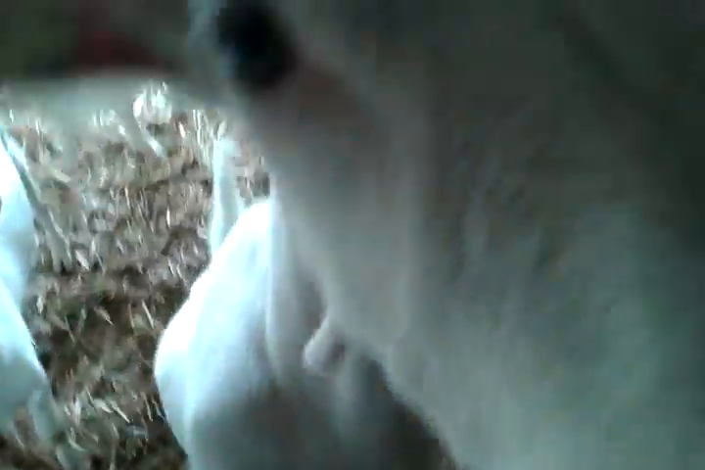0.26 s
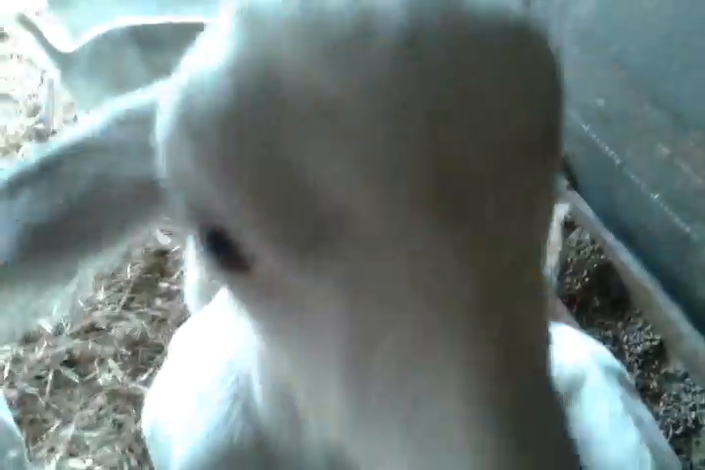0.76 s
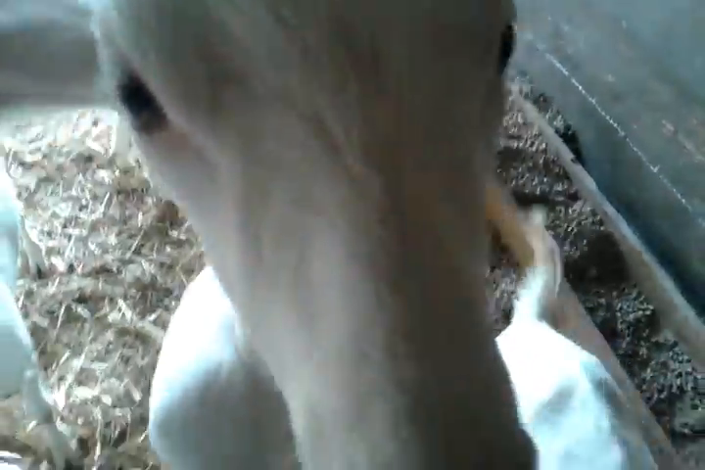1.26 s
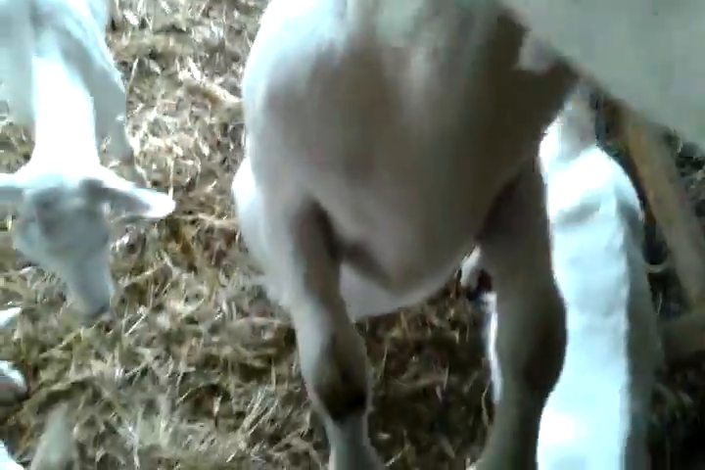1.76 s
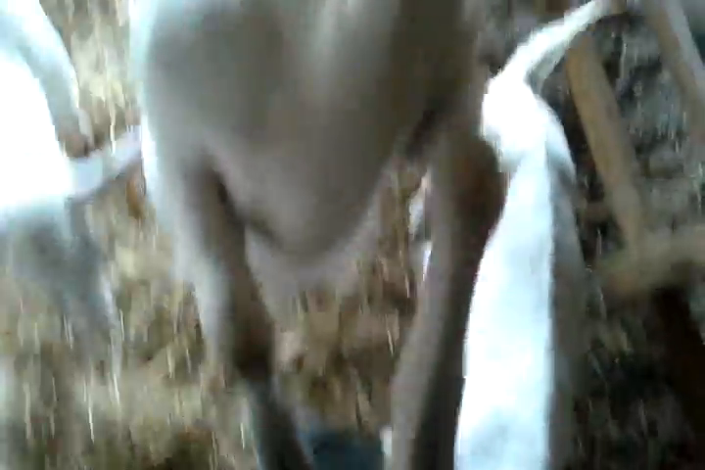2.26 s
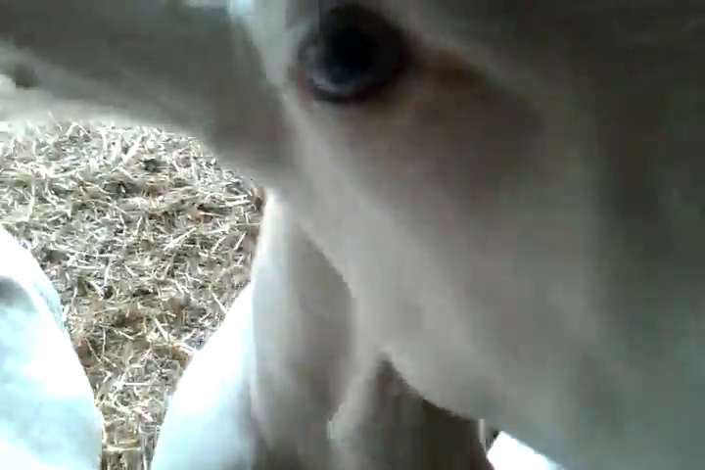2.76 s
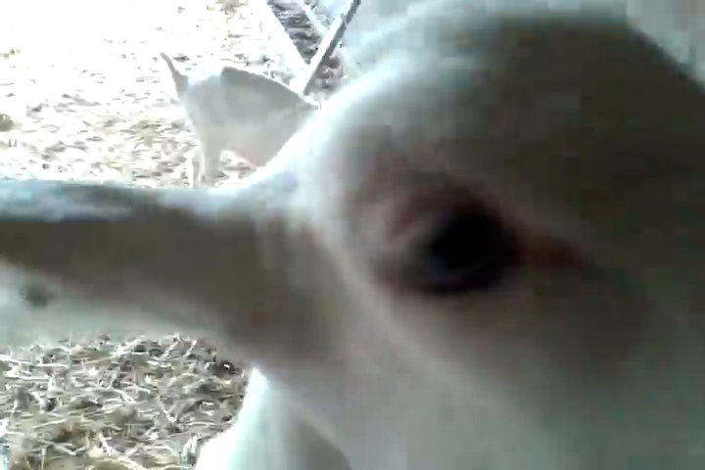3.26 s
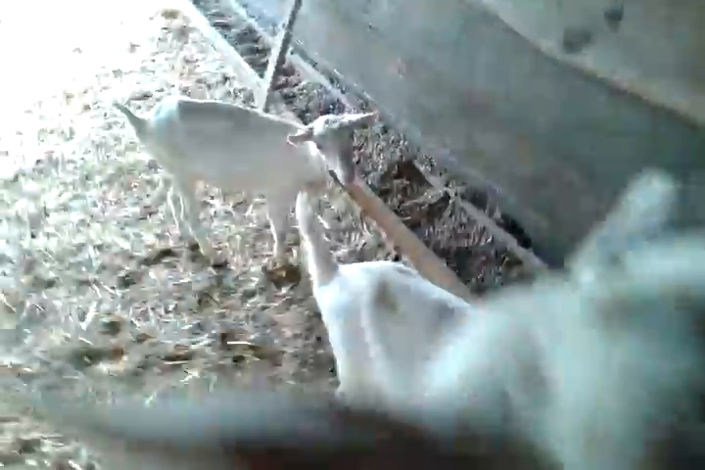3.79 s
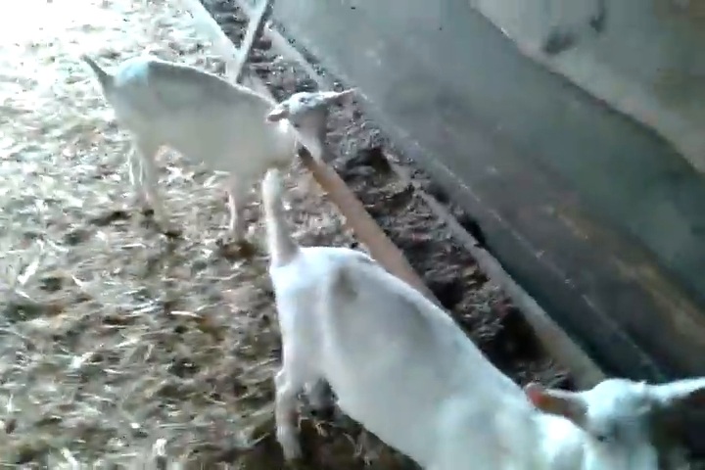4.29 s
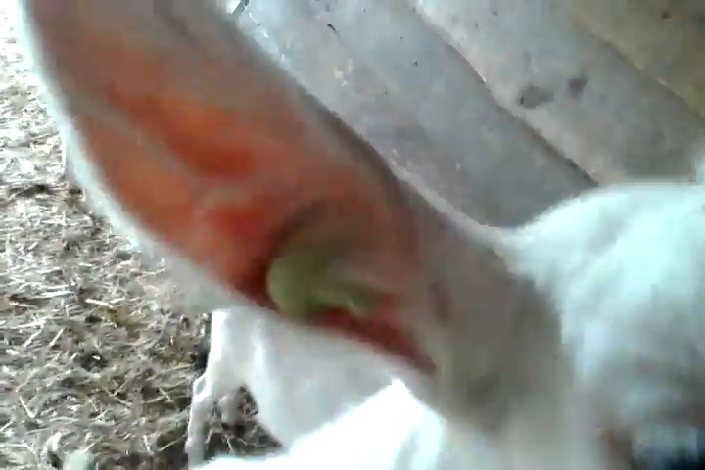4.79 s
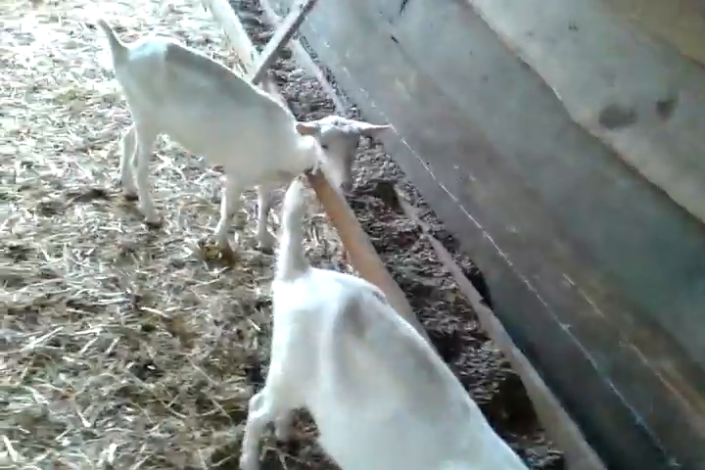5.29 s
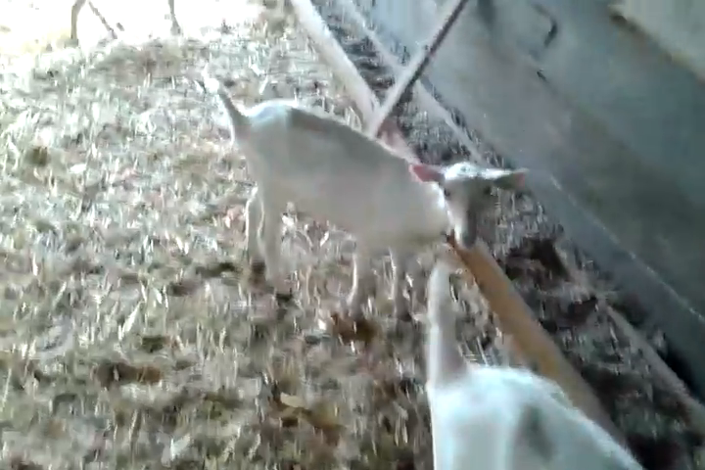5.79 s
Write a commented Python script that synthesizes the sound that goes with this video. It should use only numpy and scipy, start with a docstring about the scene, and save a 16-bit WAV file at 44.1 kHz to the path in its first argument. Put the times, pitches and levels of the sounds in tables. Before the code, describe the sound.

One loud quavering kid-goat bleat up close, then rustling straw, a whistly sniff, soft microphone bumps and late hard knocks on loose wood.

```python
"""A young goat bleats close to the microphone in a straw-bedded pen; another answers faintly from afar. Hooves
shuffle in the straw, a muzzle sniffs at the microphone, bodies bump it and hooves knock a wooden trough. Voices
are harmonics and breath through gliding formants; straw is grainy noise, and the rustle sounds strongest near
1.7 and 8 kHz. Snaps and bumps are noise puffs through a resonance; the trough is a set of dying modes."""
import sys
import numpy as np
from scipy import signal
from scipy.fft import rfft, irfft, next_fast_len
from scipy.io import wavfile
from scipy.ndimage import uniform_filter1d, map_coordinates

SR = 44100
rng = np.random.default_rng(int(sys.argv[2]) if len(sys.argv) > 2 else 0)


def digitize_waveform(pressure):
    """Quantize a signal to 16-bit integers and store it at the path in sys.argv[1].

    Rows of a 2-D input are taken as channels; values are limited to [-1, 1].
    """
    field = np.atleast_2d(pressure).T
    bounded = np.clip(field, -1, 1)
    quanta = np.round(bounded * 32767).astype(np.int16)
    wavfile.write(sys.argv[1], SR, quanta)


N = 266362  # samples


def amp(db):
    """Decibels to amplitude factor."""
    return 10 ** (np.asarray(db) / 20)


def unit(x):
    """x scaled to an rms of 1."""
    return x / np.sqrt(np.mean(x ** 2) + 1e-20)


def along(points, hz):
    """(Hz, value) points read at hz on a log frequency axis."""
    f, v = np.transpose(points)
    return np.interp(np.log(hz + 1), np.log(f + 1), v)


def curves(rows, t):
    """Each column after the time, read at times t."""
    s, *cols = np.transpose(rows)
    return [np.interp(t, s, c) for c in cols]


def wobble(rate, size=N):
    """A smooth random curve, rate knots a second."""
    knots = rng.standard_normal(int(size * rate / SR) + 4)
    return map_coordinates(knots, [np.arange(size) * rate / SR])


def filtered(x, response):
    """x times a complex response of frequency."""
    m = next_fast_len(len(x) + 8192)
    spectrum = rfft(x, m) * response(np.fft.rfftfreq(m, 1 / SR))
    return irfft(spectrum, m)[:len(x)]


def peak(hz, centre_hz, width_hz):
    """Response of one causal resonance."""
    return 1j * hz * width_hz / (centre_hz ** 2 - hz ** 2 + 1j * hz * width_hz)


def add(track, s, sound):
    """Mix a sound in at s seconds."""
    spot = track[round(s * SR):][:len(sound)]
    spot += sound[:len(spot)]


def steady(x):
    """x with its slow level divided out."""
    return x / np.sqrt(np.abs(uniform_filter1d(x ** 2, SR // 40)) + 1e-12)


def tract(hz, shape):
    """Gain of mouth, throat and body at hz, for the formant frequencies and strengths in shape."""
    # widths of the four mouth formants [Hz]
    formant_widths_hz = [150, 190, 158, 325]
    # the throat's fixed ring: f/Hz, width/Hz, level/dB
    throat_ring = [(5400, 1500, -6), (6900, 600, 0), (7550, 400, -1)]
    # unmoving resonances of chest and nose: f/Hz, width/Hz, level/dB
    chest_and_nose = [(305, 120, -14.5), (655, 92, -12)]
    throat_top_hz = 7830
    formants_hz, second_db, third_db, fourth_db, ring_db = shape[:4], *shape[4:]
    strengths = amp([0 * ring_db, second_db, third_db, fourth_db])
    formants = zip(formants_hz, formant_widths_hz, strengths)
    mouth = sum(np.abs(g * peak(hz, c, w)) ** 2 for c, w, g in formants)
    ring = sum(amp(db) * np.abs(peak(hz, c, w)) ** 2 for c, w, db in throat_ring)
    body = sum(np.abs(amp(db) * peak(hz, c, w)) ** 2 for c, w, db in chest_and_nose)
    pocket = amp(-5 * np.exp(-((hz - 4600) / 200) ** 2))  # a side pocket of the throat traps this band
    gain = np.sqrt(body + mouth + (amp(ring_db) * ring) ** 2)
    return gain * pocket / np.sqrt(1 + (hz / throat_top_hz) ** 24)


def voice(folds, level_rows, mouth, quavers, jitter, shimmer_db, count):
    """Harmonics of the vocal folds and air noise, through a mouth whose formants may glide."""
    t = np.arange(level_rows[0][0] * SR, level_rows[-1][0] * SR) / SR
    (hz, hoarse), (db,) = curves(folds, t), curves(level_rows, t)
    slack_hz = sum(depth_hz * np.exp(-((t - s) / width) ** 2) for s, depth_hz, width in quavers)
    hz = hz - slack_hz
    hz = hz * (1 + jitter * np.sqrt(hoarse) * wobble(150, size=len(t)))  # hoarse cycles are uneven
    phase = 2 * np.pi * np.cumsum(hz) / SR

    slow = slice(None, None, 32)  # the mouth moves slowly
    shape = curves(mouth, t[slow])
    tone = np.zeros(len(t))
    for k in range(1, count + 1):
        level_db = -0.022 * k * slack_hz  # slack folds close softly and dull the upper harmonics
        level_db += shimmer_db * (1 + k / 16) * wobble(45.06, size=len(t))
        gain = np.interp(t, t[slow], tract(k * hz[slow], shape))
        # phases spread within each cycle and the overtones drift
        lag = .04 * k * wobble(55, size=len(t)) - .13 * k * k
        tone += amp(level_db) * gain * np.cos(k * phase + lag)

    f, frames, z = signal.stft(rng.standard_normal(len(t)), SR, nperseg=1024)
    f = f[:, None]
    z = z * tract(f, curves(mouth, t[0] + frames))
    z = z * (f / (f + 1500)) ** 2  # air noise is weak in the bass
    air = signal.istft(z, SR, nperseg=1024)[1][:len(t)]
    breath = steady(air) * (.9 + .6 * np.cos(phase))  # puffed once a cycle

    out = np.zeros(N)
    add(out, t[0], amp(db) * (np.sqrt(1 - hoarse) * steady(tone) + np.sqrt(hoarse) * breath))
    return out


def near_goat():
    """The close bleat: the folds quaver in pitch while the mouth opens and shuts."""
    # loudness of the bleat: t/s, level/dB
    bleat = [(0, -34), (.06, -43.5), (.23, -36.5), (.27, -33.5), (.32, -29), (.5, -27.5), (.56, -30),
             (.63, -28), (0.846, -28), (.865, -34.5), (.885, -41.5), (.94, -52.5), (.97, -78)]
    # vocal folds: t/s, f/Hz of the pitch, hoarseness [0-1]
    folds = [(0, 287, .2), (.04, 288, .15), (.062, 325, .04), (.15, 325, .015), (.232, 335, .02),
             (.26, 328, .05), (.43, 328.5, .06), (.47, 329, .02), (.515, 331.5, .02), (.57, 329, .025),
             (.6, 322, .03), (.655, 323, .03), (.682, 332.5, .03), (.72, 323.5, .025), (.748, 323, .03),
             (.775, 314, .02), (.835, 314, .02), (.89, 276, .12), (.97, 268, .08)]
    # opening mouth: t/s, four formants f/Hz, then level/dB of second, third, fourth and of the throat's ring
    mouth = [(.03, 290, 1830, 2040, 3780, 0, -28, -2, -31), (.17, 314, 1340, 1960, 3180, -8, -5, -15, -19),
             (.25, 425, 1200, 1990, 3460, -4.5, -11, -19, -16),
             (.33, 660, 1500, 2000, 3800, -49, -13.5, -7.5, -11.5),
             (.42, 780, 1400, 2020, 3800, -23, -4.5, -8.5, -9),
             (.5, 890, 1360, 1970, 3930, -24, 2, 0.5, -9), (.56, 830, 1550, 2290, 3630, -2.5, -7, -12, -8),
             (.63, 870, 1530, 2200, 3180, 0, -4, -6.5, -4.5),
             (.69, 750, 1430, 2310, 3970, -1, -1.5, 4.5, -3.5),
             (.74, 725, 1610, 2240, 3180, 5.5, 3, 0.5, -3),
             (.82, 605, 1580, 2200, 3320, -0.5, -5.5, -11.5, -8.5),
             (.88, 605, 1420, 2050, 3320, -0.5, -16, -9, -15),
             (.93, 278, 1360, 2020, 3420, -22, -30, -30, -35)]
    # pitch dips: t/s, depth/Hz, half width/s
    quavers = [(.304, 13, .014), (.368, 12, .015), (.414, 11, .012), (.548, 3, .01), (.638, 5, .011)]
    return voice(folds, bleat, mouth, quavers, jitter=.012, shimmer_db=1.8, count=30)


def shuffle():
    """Straw hisses, hooves scuff and bodies rumble as the herd moves; a dragged hoof swells briefly."""
    # the herd's steady stirring: t/s, straw hiss level/dB, body rumble level/dB
    stirring = [(0, -45.5, -59), (.5, -40.5, -56), (.95, -46, -55), (1.2, -39, -53.5), (1.28, -43, -70),
                (1.7, -43.5, -52), (2.06, -43.5, -52), (2.11, -47, -63), (2.3, -48.5, -70),
                (2.5, -43.5, -58), (2.72, -50, -62), (2.95, -42, -64), (3.3, -42.5, -55),
                (3.41, -51, -65.5), (3.78, -49.5, -68.5), (4.2, -44.5, -65), (4.36, -53.5, -67.5),
                (4.65, -54.5, -70), (4.75, -43.5, -72), (5.12, -43.5, -68), (5.2, -40.5, -56),
                (5.65, -46, -43), (5.85, -46, -69), (6.04, -46, -67)]
    # hooves dragged through straw: t/s, length/s, then level/dB of hiss, scuff and rumble
    scrapes = [(0, 0.13, -60, -41.5, -49.5), (0.152, .28, -47.5, -46.5, -81), (0.376, 0.13, -57, -60, -48),
               (0.678, 0.034, -60, -60, -48), (0.712, 0.11, -49, -62, -38.5),
               (1.582, 0.12, -65, -58.5, -58), (1.762, 0.031, -78, -49, -52.5),
               (1.826, .06, -74, -50, -49.5), (1.875, 0.14, -48, -51, -80), (2.122, 0.15, -45.5, -64, -89),
               (2.3, 0.092, -50, -66, -61), (2.364, 0.13, -49.5, -70, -67), (2.663, 0.049, -59, -60, -54),
               (2.766, 0.13, -58, -58.5, -87), (2.885, 0.12, -59, -52, -45), (3.015, 0.14, -55, -52.5, -62),
               (3.161, .13, -55, -50.5, -53), (3.426, .04, -51, -80, -78), (3.452, 0.16, -54.5, -61, -87),
               (3.622, 0.16, -51.5, -64.5, -62), (3.782, 0.13, -48.5, -51.5, -58.5),
               (4.01, 0.18, -55, -68, -78), (4.393, 0.036, -51, -60, -76), (4.494, 0.12, -54, -67, -78),
               (4.799, 0.058, -48, -57, -62), (4.934, 0.041, -53, -50, -55.5),
               (5.183, 0.049, -44, -45.5, -48), (5.325, .048, -74, -61, -60), (5.41, 0.017, -59, -37, -70),
               (5.54, 0.044, -59, -52, -42), (5.63, .019, -57, -39.5, -58), (5.636, 0.065, -54, -36, -53),
               (5.703, 0.12, -48, -48, -51), (5.813, 0.078, -49, -72, -82), (5.898, 0.057, -50, -63, -66),
               (5.997, 0.041, -62, -48, -80)]
    # spectra of the three layers: f/Hz, level/dB per Hz
    straw_spectrum = [(1470, -28), (2500, -19), (5390, -14), (7220, -0.5), (7980, 2), (9600, -13),
                      (15100, -24.5), (15700, -33)]
    scuff_spectrum = [(400, -15.5), (700, -15), (1300, -8.5), (1620, 1.5), (1900, 2), (2500, -9),
                      (3600, -9.5), (4800, -15.5), (5900, -25), (7000, -14), (9000, -120)]
    rumble_spectrum = [(18, -40), (30, 4), (70, -0.5), (156, -6.5), (276, -0.5), (500, -2.5), (700, -6),
                       (1000, -10.5), (1400, -6), (2200, -55)]
    hiss, rumble = amp(curves(stirring, np.arange(N) / SR))
    scuff = amp(-11) * hiss  # the steady scuff lies 11 dB below the straw hiss
    for s, length, *levels_db in scrapes:
        swell = np.sqrt(np.hanning(round(length * SR)))
        for layer, db in zip((hiss, scuff, rumble), levels_db):
            add(layer, s, amp(db) * swell)
    hiss = hiss * rustle(straw_spectrum, grain_db=1.0, flicker_db=0.77)
    scuff = scuff * rustle(scuff_spectrum, grain_db=0.5, flicker_db=1.5)
    return hiss + scuff + rumble * rustle(rumble_spectrum, grain_db=1.5, flicker_db=3)


def rustle(spectrum, grain_db, flicker_db):
    """Noise of unsteady level, shaped to a spectrum, of rms 1."""
    level_db = grain_db * wobble(700) + flicker_db * wobble(45)
    grains = amp(level_db) * rng.standard_normal(N)
    return unit(filtered(grains, lambda hz: amp(along(spectrum, hz))))


def straw_snaps():
    """Stalks snap in mid band and thin ones tick high up, each a short broad pop."""
    # straw snaps: t/s, peak level/dB, centre f/Hz, puff t60/s, width [share of centre]
    snaps = [(.049, -24.5, 1580, 0.02, 1.2), (.4475, -17, 1820, 0.018, 0.5),
             (.734, -20.5, 1360, 0.017, 0.7), (1.436, -35, 900, 0.025, 2.3),
             (2.323, -39, 1197, 0.0081, 1.5), (2.3735, -30, 1150, 0.0073, 1.1),
             (2.5545, -26.5, 1840, 0.0024, 0.33), (2.684, -34.5, 900, 0.004, 1.4),
             (3.088, -33, 1100, .006, 1.4), (4.393, -42.5, 800, .0035, 3.3),
             (4.565, -38, 1500, 0.0097, 2.9), (4.828, -27.5, 1920, 0.026, 0.3), (4.95, -34, 1835, .008, 1),
             (5.1945, -23, 1660, 0.019, 1.5), (5.4055, -24, 1800, 0.033, 1.1),
             (5.6345, -26.5, 2230, 0.024, 0.29), (5.6615, -26, 4570, .0049, .41),
             (5.931, -31, 1010, 0.0065, 1.5)]
    # thin stalks ticking: t/s, peak level/dB
    thin_stalks = [(.1915, -26), (.4225, -32), (2.344, -37), (2.9737, -40), (3.3454, -34), (4.155, -30),
                   (4.4484, -29), (4.706, -41), (5.1977, -36), (5.408, -38)]
    tick_hz, tick_t60_s, tick_width = 9800, 0.0039, 1.1
    ticks = [(s, db, tick_hz, tick_t60_s, tick_width) for s, db in thin_stalks]
    return pops(snaps + ticks, puff=0.25)


def bumps():
    """Bodies nudge the microphone: soft low pops with little noise in them."""
    # bumps: t/s, peak level/dB, centre f/Hz
    nudges = [(.742, -32, 504), (1.449, -44.5, 150), (1.619, -44, 88.5), (1.796, -34.5, 276),
              (2.382, -46, 130), (2.686, -39, 165), (2.914, -36.5, 200), (3.091, -38, 233),
              (3.19, -44, 79.5), (3.29, -45, 80), (3.441, -43.5, 103), (3.633, -46.5, 105),
              (3.664, -50, 90), (3.88, -41.5, 120), (4.394, -41.5, 208), (5.161, -40.5, 127)]
    t60_s, width = 0.057, 1.13  # of the noise puff; share of centre
    return pops([(s, db, hz, t60_s, width) for s, db, hz in nudges], puff=0.023)


def pops(rows, puff):
    """One push and a dying puff of noise through a broad resonance."""
    out, t = np.zeros(N), np.arange(SR // 6) / SR
    for s, db, hz, t60, spread in rows:
        push = puff * amp(-60 * t / t60) * rng.standard_normal(len(t))
        push[0] += 1
        pop = filtered(push, lambda f: peak(f, hz, spread * hz) ** 2)
        add(out, s, amp(db) * pop / np.abs(pop).max())
    return out


def sniff():
    """Air whistles through the nostrils in fluttering puffs."""
    # one table a sniff: t/s, level/dB
    sniffs = [
        [(0.95, -45.5), (1.07, -27), (1.092, -32), (1.118, -29), (1.182, -27.5), (1.25, -50), (1.28, -57)],
        [(4.68, -56), (4.716, -46), (4.788, -47), (4.816, -32.5), (4.842, -53), (4.862, -41), (4.9, -58)],
    ]
    # nostril resonances: f/Hz, width/Hz, level/dB
    nostrils = [(6220, 880, -4.5), (7630, 360, 13), (8200, 390, 9.5), (9400, 570, -13.5)]

    def nose(f):
        # neighbouring resonances have opposite signs
        return sum((-1) ** k * amp(db) * peak(f, c, w) for k, (c, w, db) in enumerate(nostrils))

    t = np.arange(N) / SR
    air = amp(2.2 * wobble(220)) * rng.standard_normal(N)
    level = np.zeros(N)
    for rows in sniffs:
        level += amp(curves(rows, t)[0]) * (t > rows[0][0]) * (t < rows[-1][0])
    return unit(filtered(air, nose)) * level


def far_goat():
    """The faint answer from afar: few harmonics, and a mouth that holds one shape."""
    # loudness of the answer: t/s, level/dB
    far_bleat = [(1.17, -81), (1.23, -67.5), (1.4, -62.5), (1.55, -62.5), (1.64, -63), (1.7, -90)]
    # the far goat's folds: t/s, f/Hz of the pitch, hoarseness [0-1]
    far_folds = [(1.17, 296, .12), (1.4, 291, .12), (1.55, 295, .12), (1.7, 308, .12)]
    # held mouth: t/s, four formants f/Hz, then level/dB of second, third, fourth and of the throat's ring
    far_mouth = [(1.4, 600, 880, 2000, 3500, -2, -14, -40, -60)]
    return voice(far_folds, far_bleat, far_mouth, [], jitter=.04, shimmer_db=3, count=8)


def knocks():
    """Each blow rings the loose boards anew; hard hoof edges wake the high modes and slide with a hiss."""
    # hoof on the trough: t/s, low modes' peak level/dB, high modes' peak level/dB, rise/s
    blows = [(5.158, -42.5, -57.5, 0.0011), (5.197, -39, -42, 0.0025), (5.272, -44, -39.5, 0.0016),
             (5.328, -39.5, -58, 0.017), (5.454, -24.5, -25, 0.0018), (5.4594, -22, -25.5, 0.00041),
             (5.501, -54, -54, 0.0014), (5.554, -27.5, -35, 0.0027), (5.662, -28.5, -17, 0.00068),
             (5.738, -38, -44, 0.0045), (5.792, -43.5, -42, 0.0031)]
    # modes of the wooden trough: f/Hz, level/dB, t60/s
    modes = [(100, -11, .15), (155, -12, .12), (262, -3, .16), (468, -2, .13), (560, -4, .1),
             (727, -12, .08), (845, -11, .08), (1017, -5, .05), (1270, -3, .06), (1615, 0, .08),
             (1790, -1, .07), (1930, -3, .065), (2300, -10, .05)]
    # hoof sliding on a board: t/s, length/s, level/dB
    rubs = [(5.193, 0.12, -45.5), (5.286, 0.11, -43), (5.411, 0.089, -41.5), (5.505, 0.11, -43.5),
            (5.656, 0.024, -38), (5.748, .06, -57)]
    # spectrum of the slide: f/Hz, level/dB per Hz
    board_spectrum = [(1000, -19), (2600, -5), (3500, -3), (4600, -11), (5900, 0), (6800, -5), (9000, -50)]
    crack_db, crack_t60_s = -12, 0.026  # noise of the crunch of contact, scaled by the high modes' peak
    out, t = np.zeros(N), np.arange(SR // 4) / SR
    for s, low_db, high_db, rise in blows:
        low, high = np.zeros(len(t)), np.zeros(len(t))
        for hz, level_db, t60 in modes:
            rattle = 1.1 * wobble(50, size=len(t))  # radians
            decay = amp(level_db + rng.normal(0, 2.5) - 60 * t / t60)
            ring = decay * np.sin(2 * np.pi * hz * rng.normal(1, .02) * t + rattle)
            add(high if hz > 1000 else low, 0, ring * amp(3 * wobble(72, size=len(t))))
        crunch = amp(-60 * t / crack_t60_s) * rng.standard_normal(len(t))
        crack = filtered(crunch, lambda f: peak(f, 1800, 2800))
        add(high, 0, amp(crack_db) * np.abs(high).max() * crack)
        swell = 1 - np.exp(-t / max(rise, 1e-4))
        for db, part in (low_db, low * swell), (high_db, high * swell):
            add(out, s, amp(db) * part / np.abs(part).max())
    slide = np.zeros(N)
    for s, length, db in rubs:
        add(slide, s, amp(db) * np.hanning(round(length * SR)))
    return out + slide * rustle(board_spectrum, grain_db=1.0, flicker_db=4.0)


def pen(x, walls_db, tail_db):
    """Direct sound, near walls as delayed copies, then the barn's tail of dying noise."""
    # near walls: delay/s, level/dB before walls_db is added
    walls = [(.0023, -44), (.0051, -6), (.0092, -5), (0.0133, -28), (0.0204, -6), (0.025, -5)]
    # decay of the barn: f/Hz, t60/s
    barn = [(200, 0.17), (2000, 0.2), (10000, 0.065)]
    out = x.copy()
    for s, db in walls:
        add(out, s, amp(db + walls_db) * x)
    hz, t, z = signal.stft(rng.standard_normal(SR // 2), SR, nperseg=256)
    decay = amp(-60 * t / along(barn, hz)[:, None])
    tail = signal.istft(z * decay, SR, nperseg=256)[1]
    add(out, .02, amp(tail_db) * signal.fftconvolve(x, tail / np.linalg.norm(tail)))
    return out


def scene():
    """Goats and hard hits sound in the pen; bumps, shuffling and sniffs reach the microphone dry."""
    goats = pen(near_goat() + far_goat(), walls_db=-10, tail_db=-12)
    hits = pen(straw_snaps() + knocks(), walls_db=-19.0, tail_db=-13)
    close = bumps() + shuffle() + sniff()
    return (goats + hits + close)[None]


def record(dry):
    """The microphone adds its own faint hiss and loses the deepest bass; nothing is kept above the band limit."""
    # the microphone's own noise: f/Hz, level/dB per Hz
    hiss_spectrum = [(30, 7), (300, -21), (3000, -2.5), (10000, -9.5), (15700, -10)]
    top_hz, bass_cut_hz = 15720, 40
    hiss = rustle(hiss_spectrum, grain_db=0, flicker_db=0)

    def response(hz):
        return (1j * hz / (bass_cut_hz + 1j * hz)) ** 3 * (hz < top_hz)

    return filtered(dry[0] + amp(-61.0) * hiss, response)[None]


dry = scene()
out = record(dry)
digitize_waveform(out)
```